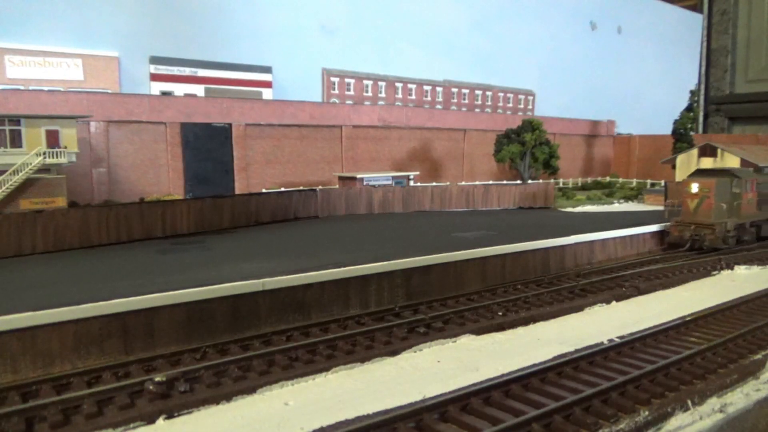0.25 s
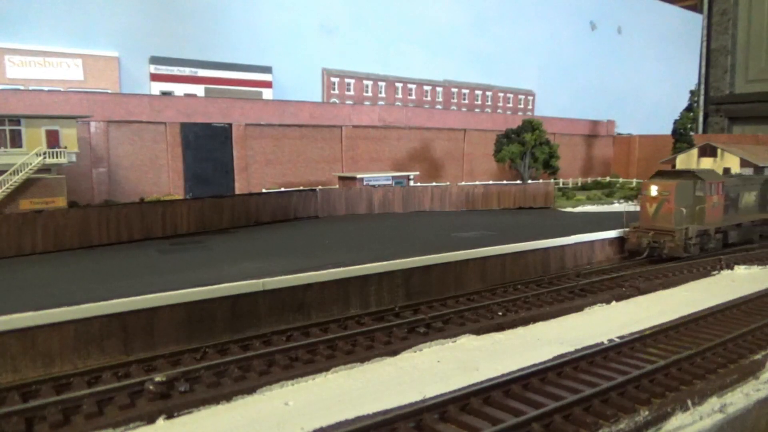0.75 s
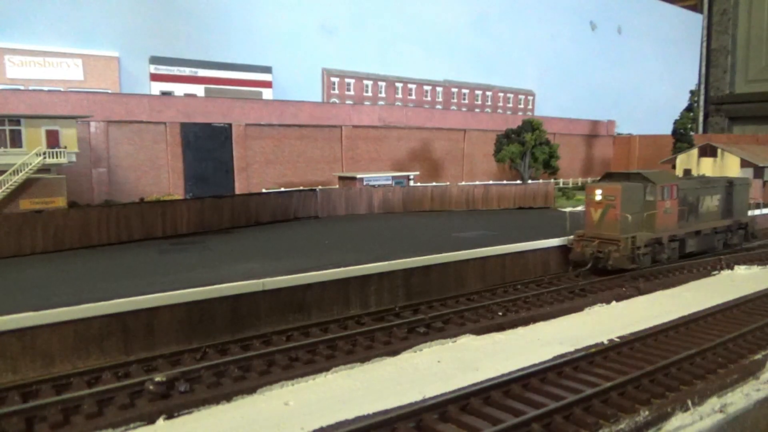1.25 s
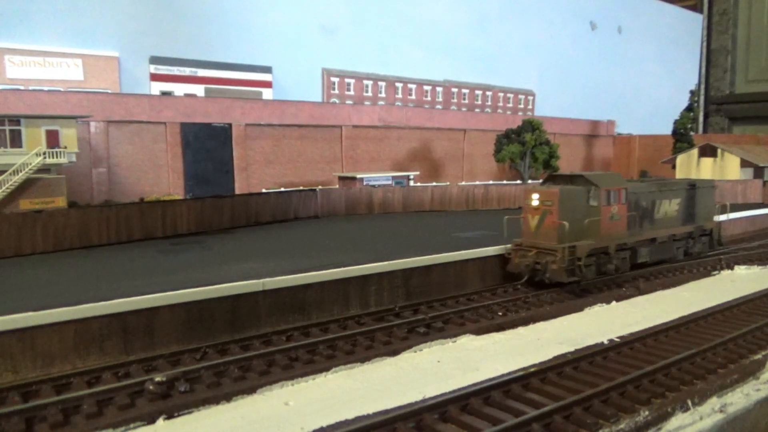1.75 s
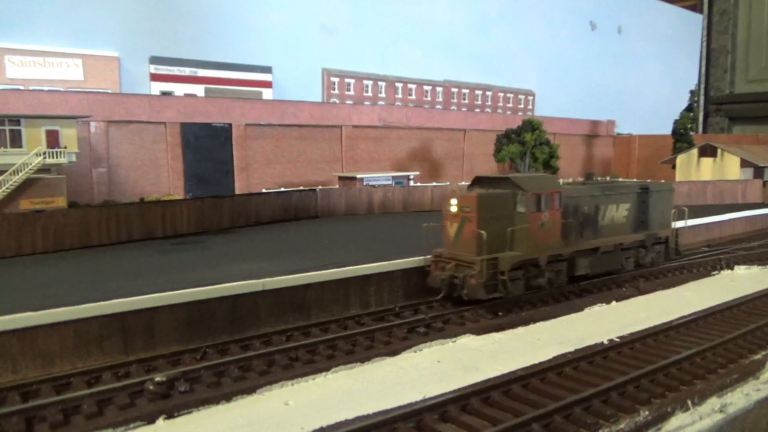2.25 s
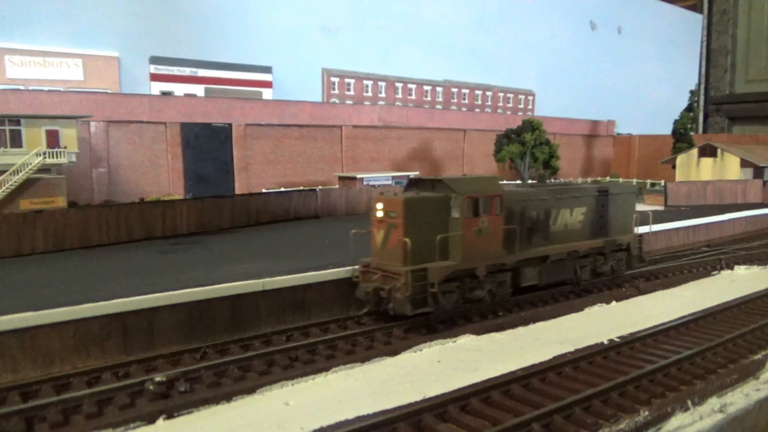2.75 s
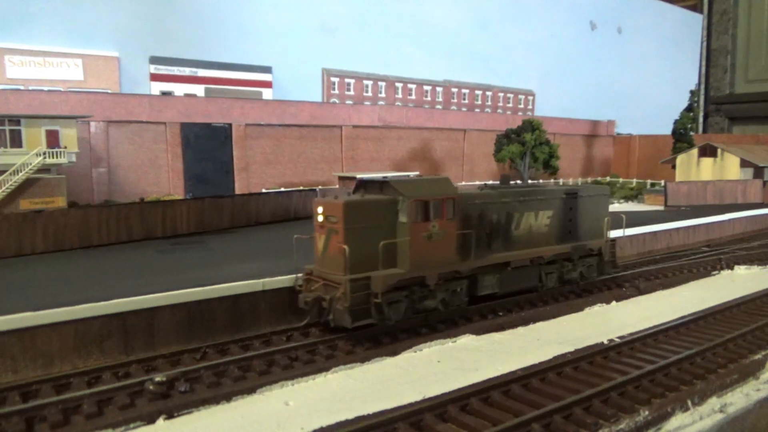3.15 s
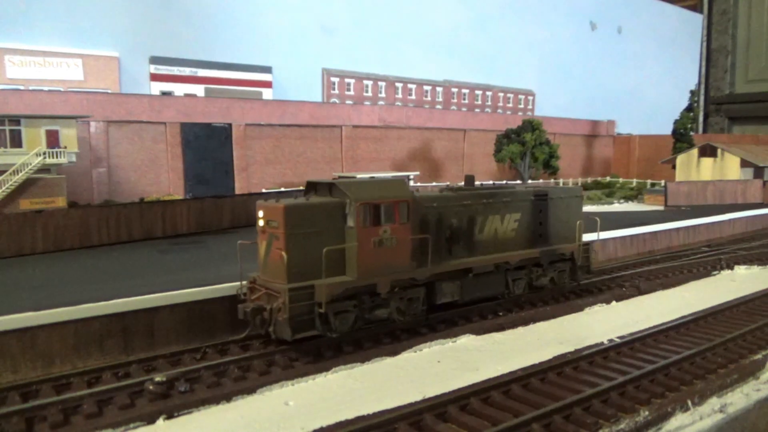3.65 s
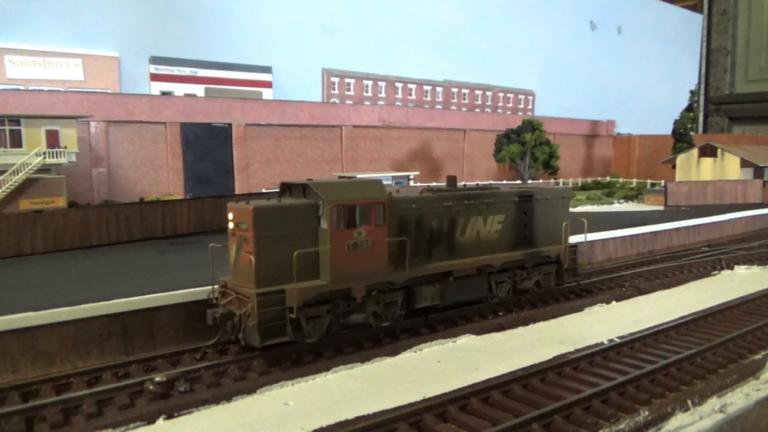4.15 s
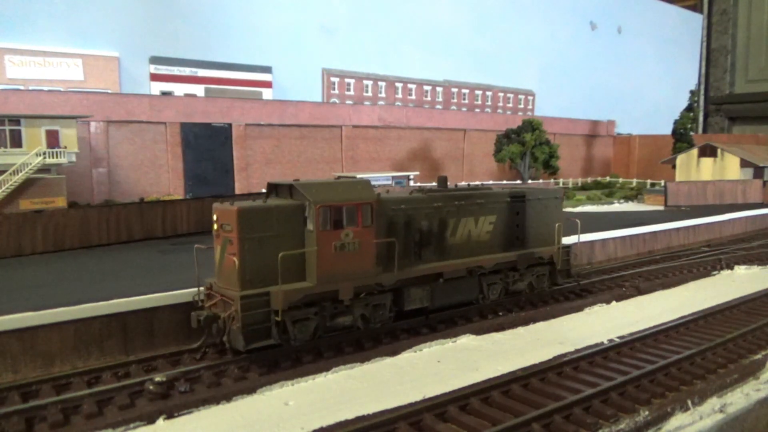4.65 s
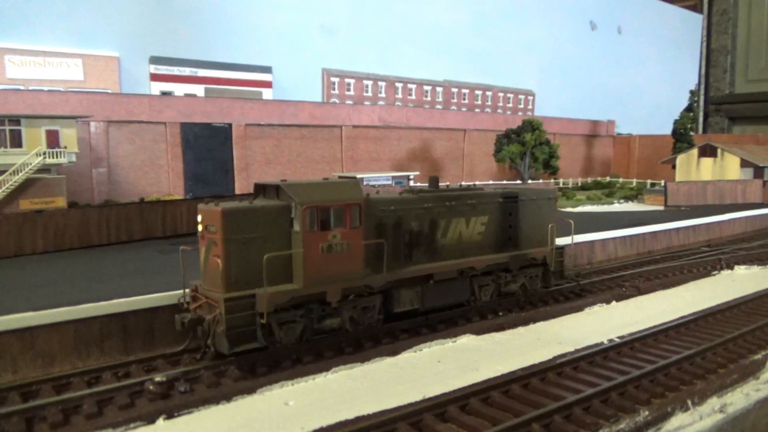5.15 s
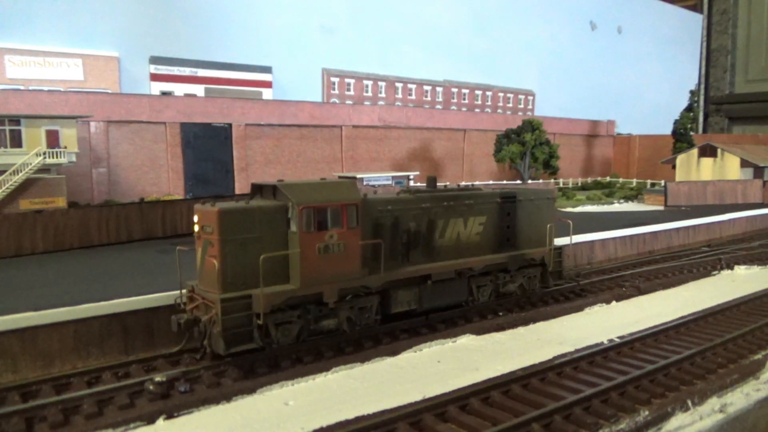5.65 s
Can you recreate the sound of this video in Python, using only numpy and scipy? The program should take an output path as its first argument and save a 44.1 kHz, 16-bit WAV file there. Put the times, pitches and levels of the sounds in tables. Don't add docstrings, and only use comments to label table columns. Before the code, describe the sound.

A quiet small room, microphone close to a model railway, with very faint transformer hum. From 0 s a small locomotive rolls steadily: soft hollow baseboard rumble, thin gear whirr, bright airy flange hiss with fine grit. Over it come dense, irregular dry metallic ticks. Stronger clacks, a bright snap with a short woody knock, fall near 0.34, 0.63, 1.8, 2.1 and 2.74 s, with brief close reflections. The hiss is brightest around 2 to 3.5 s. From about 3.3 s it slows; the rumble drops and a quiet, raspy motor buzz of roughly 95 pulses per second swells in, with tiny dropouts. Ticks become sparse and weaker. A very short high squeak comes at 4.02 s, and a faint thin singing tone at 4.4 to 4.8 s. Small ticks follow near 5.1 to 5.3 s. At 5.62 s the buzz ends with a little click, then tiny settling ticks and near silence.

```python
import sys
import numpy as np
from scipy import signal
from scipy.fft import rfft, irfft
from scipy.io import wavfile
from scipy.ndimage import uniform_filter1d, map_coordinates

SR = 44100
rng = np.random.default_rng(int(sys.argv[2]) if len(sys.argv) > 2 else 0)


def unload_wav(signal):
    wavfile.write(
        sys.argv[1],
        SR,
        np.round(np.clip(np.atleast_2d(signal).T, -1, 1) * 32767).astype(np.int16),
    )


def attenuation_scalar(level_db):
    decades = np.asarray(level_db, float) / 20
    return 10 ** decades


N = 259737
TOP_HZ = 11030

# (frequency [Hz], density [dB per Hz])
ROOM_AIR = [(12, -63), (20, -30), (191, -12), (243, -8.5), (285, -3.5), (352, -5), (402, -8), (459, -6),
            (702, -13.5), (1690, -17.5), (3450, -16), (5720, -21.5), (8980, -28), (10300, -16.5),
            (11400, -26), (14800, -65), (22000, -120)]
# (frequency [Hz], level [dB rms])
MAINS = [(100, -91), (150, -87.5), (200, -79), (300, -71.5), (400, -68), (500, -80.5), (7800, -84),
         (8780, -89.5)]
# (frequency [Hz], likeness [0..1])
ALIKE = [(30, 0.94), (300, 0.84), (1000, 0.59), (4000, 0.71), (10000, 0.68)]
# (time [s], level [dB])
SQUEAK = [
    (4.0105, -44.5),
    (4.033, -40.5),
    (4.042, -52),
]
# (frequency [Hz], width [Hz], level [dB])
SQUEAK_RINGS = [(2880, 49, -2), (5170, 250, 5.5), (6850, 240, 4), (8400, 280, 3.5), (10040, 390, 6)]
# (time [s], level [dB])
WIPER = [
    (4.41, -72),
    (4.45, -68),
    (4.785, -65),
]
# (time [s], peak level [dB], pitch [Hz], t60 [s])
RIMS = [(.3444, -21.5, 5410, 0.01), (.6266, -24.5, 4430, 0.016), (.798, -26.5, 5570, 0.014),
        (1.7937, -16.5, 7970, 0.0077), (2.0389, -22.5, 8680, 0.023), (2.0395, -24.5, 4660, .012),
        (2.086, -18, 5120, 0.01), (2.089, -27, 6700, 0.0057), (2.7414, -17, 6550, .011),
        (2.8713, -29.5, 6640, 0.017), (3.214, -22, 5640, 0.011)]
# (time [s], peak level [dB])
COUPLER = [(.2104, -34), (.3022, -32), (.4274, -42), (.7367, -37), (.7834, -41), (.903, -32), (1.015, -30),
           (1.411, -32.5), (1.9919, -33), (2.016, -31), (3.3583, -31.5), (3.398, -38)]
# (time [s], peak level [dB])
AXLES = [(.1125, -29.5), (.1595, -30.5), (.178, -31), (.313, -44), (.508, -32.5), (.532, -30.5),
         (.5466, -29), (.57, -36), (.6609, -33), (.673, -38), (.761, -33), (.8295, -28), (.8583, -27.5),
         (.9172, -29), (.9325, -28.5), (.945, -29), (1.0789, -28.5), (1.2792, -26.5), (1.296, -27.5),
         (1.6691, -31.5), (1.7357, -31), (2.9616, -32), (3.1843, -32), (3.747, -39), (3.7899, -34.5),
         (3.9776, -42)]
# (time [s], peak level [dB])
PICKUPS = [(.1461, -42), (.521, -34), (1.2083, -36.5), (1.3467, -30), (1.4356, -41), (1.5058, -27.5),
           (1.551, -28), (1.5974, -29), (1.6202, -30), (1.6432, -31), (1.8766, -29.5), (1.9004, -34),
           (2.0677, -24), (2.3765, -28.5), (2.4379, -37), (2.453, -30), (2.6492, -24.5), (2.7753, -28.5),
           (2.8415, -34), (2.8913, -27.5), (3.03, -29), (3.081, -33), (3.129, -43), (3.155, -31),
           (3.2735, -28)]
# (time [s], peak level [dB])
CREEPING = [(3.5735, -34), (3.6036, -30), (3.6262, -33), (3.6987, -29), (3.716, -28), (4.156, -36),
            (4.2068, -35.5), (4.2279, -38), (4.2749, -36.5), (4.2994, -39), (4.8753, -41), (5.1238, -41),
            (5.1412, -42.5), (5.1754, -33.5), (5.2704, -39.5)]
# (contacts, pitch [Hz], t60 [s])
LOOSE_PARTS = [(COUPLER, 3600, 0.005), (AXLES, 5200, 0.0068), (PICKUPS, 8400, 0.0039),
               (CREEPING, 9100, 0.014)]
# (time [s], peak level [dB], board pitch [Hz], chassis level re peak [dB], chassis pitch [Hz])
JOINTS = [(0.3437, -24.5, 1043, 0.5, 2530), (0.6263, -20.5, 1179, -9, 2400),
          (0.7994, -39.5, 1190, -1, 2430), (.9333, -40, 1070, 0, 2560), (1.0794, -50.5, 1175, 9, 1890),
          (1.2951, -43.5, 1110, -1.5, 3060), (1.7928, -26, 1210, -5.5, 2915),
          (2.084, -18.5, 1059, -7, 2050), (2.1966, -40.5, 1090, -0.5, 3340), (2.6277, -49.5, 1190, 7, 2380),
          (2.6858, -40.5, 1145, -27, 2190), (2.7417, -30, 1228, 0.5, 2210), (2.8705, -35, 1120, -2, 2550),
          (3.0837, -45, 1150, -5, 2300), (3.1597, -48, 1640, 2.5, 2410), (3.2118, -39, 1310, 7.5, 2160),
          (3.3981, -45, 1300, -3, 2300), (3.556, -61, 1200, 12.5, 3380), (4.0856, -56.5, 1110, 4.5, 2320),
          (4.374, -54, 810, -7, 2500), (4.67, -52, 1070, -11, 2250), (4.81, -50, 970, -2, 2320),
          (4.9197, -62, 1230, 13.5, 2640), (4.937, -49, 996, -12, 2330)]
# (time [s], speed re cruising [dB], give of the board [dB], flange pressure [dB])
RUN = [(0, -1, 3, -10), (.31, 1.5, 1, -6.5), (.7, 0.5, 4, -7), (.95, 0.5, -5, -3), (1.3, 0, -8.5, -2),
       (1.6, 0.5, -3, -2.5), (1.9, 1, -1.5, -3.5), (2.1, 2, 2, -1), (2.48, 0, -4.5, 0), (2.82, 0, -0.5, 0),
       (3.2, -3.5, -1.5, 2), (3.48, -2.5, -7, 0), (4.05, -6.5, -7, 1), (4.75, -6.5, -3.5, -0.5),
       (5.4, -9.5, -4.5, -3.5), (5.65, -13, 7, -2), (5.89, -16.5, 13, 0.5)]
# (frequency [Hz], density [dB per Hz])
FLANGE_HISS = [(2240, -12.5), (3800, -10), (4300, -10), (4670, -3.5), (5080, -0.5), (6300, 1), (7540, -0.5),
               (8690, 2.5), (9490, 0), (11000, -4.5), (11400, -9), (14800, -49), (22000, -120)]
# (frequency [Hz], width [Hz], level [dB])
MOTOR_CASE = [(2310, 120, 1), (2640, 180, -4), (3010, 120, -4), (3370, 240, -2.5), (3950, 160, -11)]
# (time [s], current pulses [per s])
PULSES = [(3.3, 92), (3.55, 94), (4.01, 96.2), (4.07, 93.8), (4.4, 96.6), (4.59, 90.7), (4.8, 91.8),
          (5.04, 97.6), (5.62, 98.1)]
BUZZ_FROM_S, SWELL_S, BUZZ_TO_S, SURGE_S = 3.3, .25, 5.62, .025
BUZZ_START_DB, BUZZ_DB, SURGE_DB = -72, -64.6, -61
# (time [s], level [dB])
LOAD = [
    (BUZZ_FROM_S, BUZZ_START_DB),
    (BUZZ_FROM_S + SWELL_S, BUZZ_DB),
    (BUZZ_TO_S - SURGE_S, BUZZ_DB),
    (BUZZ_TO_S, SURGE_DB),
]
# (time [s], length [s], depth [dB])
STALLS = [(3.847, 0.015, -17), (4.063, 0.037, -17), (4.28, 0.017, -14), (4.412, 0.024, -21),
          (4.835, 0.061, -8), (5.179, 0.037, -21), (5.453, 0.081, -8)]
# (time [s], peak level [dB], pitch [Hz])
SETTLE = [(5.623, -44, 2660), (5.6516, -52, 2760), (5.6755, -58, 3560), (5.7114, -64, 3500),
          (5.7523, -55, 3410), (5.7907, -64, 2710), (5.8343, -58, 3480), (5.8711, -61, 3470)]
# (frequency [Hz], density [dB per Hz])
BOARD = [(210, -44), (350, -14.5), (395, -10), (427, -13), (520, -10), (695, -6), (824, -8), (1140, -9.5),
         (1370, -9), (1900, -13.5), (2470, -44), (4180, -120)]
# (frequency [Hz], density [dB per Hz])
LEGS = [(15, -60), (25, -31), (172, -9), (195, -14), (226, -6), (280, -8), (360, -45), (620, -120)]
# (frequency [Hz], density [dB per Hz])
GEARS = [(880, -49), (1500, -6), (1680, -0.5), (1820, -7), (2220, 2), (2840, -1), (3290, -1), (3540, -3),
         (4500, -6.5), (5850, -11), (9900, -120)]


def unit(x):
    return x / np.sqrt(np.mean(x ** 2) + 1e-20)


def along(points, hz):
    f, v = np.transpose(points)
    return np.interp(np.log(hz + 1), np.log(f + 1), v)


def curves(rows):
    s, *cols = np.transpose(rows)
    return [np.interp(np.arange(N) / SR, s, c) for c in cols]


def during(rows):
    start, end = rows[0][0], rows[-1][0]
    return np.interp(np.arange(N) / SR, [start - .002, start, end, end + .002], [0, 1, 1, 0])


def wobble(rate):
    coarse = np.arange(0, N + 16, 16)
    knots = rng.standard_normal(int(N * rate / SR) + 4)
    return np.interp(np.arange(N), coarse, map_coordinates(knots, [coarse * rate / SR]))


def filtered(x, response):
    m = 9 * 2 ** 15
    return irfft(rfft(x, m) * response(np.fft.rfftfreq(m, 1 / SR)), m)[..., :N]


def rings(modes):
    def response(f):
        total = 0
        for k, (centre, width, db) in enumerate(modes):
            damping = 1j * f * width
            total = total + (-1) ** k * attenuation_scalar(db) * damping / (centre * centre - f * f + damping)
        return total
    return response


def rush(spectrum, lumps_db, rate):
    pair = rng.standard_normal((2, N)) * attenuation_scalar(lumps_db * wobble(rate))

    def response(hz):
        turn = np.arccos(np.clip(along(ALIKE, hz), -1, 1)) / 2
        return attenuation_scalar(along(spectrum, hz)) * [np.cos(turn), np.sin(turn)]
    mid, side = filtered(pair, response)
    return unit(np.array([mid + side, mid - side]))


def band(centre_hz, width_hz, lumps_db, rate, apart_hz=0):
    noise = rng.standard_normal((4, N)) * attenuation_scalar(lumps_db * wobble(rate))
    slow = filtered(noise, lambda hz: 1 / (1 + (2 * hz / width_hz) ** 4))
    turn = 2 * np.pi * np.cumsum(centre_hz) / SR
    second_turn = turn + 2 * np.pi * apart_hz * np.arange(N) / SR
    mid, side = slow[:2] * np.cos(turn) + slow[2:] * np.sin(second_turn)
    return unit(np.array([mid + 0.054 * side, mid - 0.32 * side]))


def struck(hz, spread, t60, attack, count, noisy):
    t = np.arange(int(SR * t60 * 1.5)) / SR
    draw = rng.standard_normal((count, 3))
    pitch = np.minimum(hz * np.exp(spread * draw[:, :1]), TOP_HZ)
    mode_t60 = t60 * np.exp(0.3 * draw[:, 2:])
    modes = attenuation_scalar(1.43 * draw[:, 1:2] - 60 * t / mode_t60) * np.sin(2 * np.pi * pitch * t)
    ring = np.sin(2 * np.pi * hz * t) * attenuation_scalar(9.0 - 60 * t / t60) + modes.sum(0)
    chatter = uniform_filter1d(rng.standard_normal(SR // 10), max(2, int(SR / hz)))[:len(t)]
    ring = ring * (1 + noisy * unit(chatter)) * (1 - np.exp(-t / attack))
    return ring / np.abs(ring).max()


def add(track, s, sound):
    track[round(s * SR):][:len(sound)] += sound


def room():
    t = np.arange(N) / SR
    hum = np.zeros(N)
    for hz, db in MAINS:
        level = attenuation_scalar(db + 1.5 + 0.15 * wobble(13))
        hum += level * np.sin(2 * np.pi * hz * t + rng.uniform(0, 6.16))
    return hum + attenuation_scalar(-69) * rush(ROOM_AIR, lumps_db=1.2, rate=97)


def walls(x, t60):
    t = np.arange(SR // 3) / SR
    tail = rng.standard_normal((2, len(t))) * attenuation_scalar(-60 * t / t60) * (t > .0015)
    return signal.fftconvolve(x[None], tail / np.linalg.norm(tail[0]), axes=1)[:, :N]


def squeaks():
    slips = rng.standard_normal(N) * attenuation_scalar(2.2 * wobble(300))
    squeak = unit(filtered(slips, rings(SQUEAK_RINGS)))
    wiper_ring = rings([(9830, 330, 0)])
    sing = unit(filtered(rng.standard_normal(N), lambda f: wiper_ring(f) ** 2))
    squeak = attenuation_scalar(curves(SQUEAK)[0]) * during(SQUEAK) * squeak
    return squeak + attenuation_scalar(curves(WIPER)[0] - 4.0) * during(WIPER) * sing


def ticks():
    track, t = np.zeros(N + SR), np.arange(SR // 30) / SR
    contacts = list(RIMS)
    for hits, hz, t60 in LOOSE_PARTS:
        contacts += [(s, db, hz, t60) for s, db in hits]
    for s, db, hz, t60 in contacts:
        crack = np.diff(rng.standard_normal(len(t) + 1))
        crack = crack * attenuation_scalar(-8 - 60 * t / (0.67 * t60)) * (1 - np.exp(-t / 0.0003))
        ring = struck(hz, spread=0.184, t60=np.clip(t60, .004, .04), attack=0.00012, count=9, noisy=1.0)
        add(track, s, attenuation_scalar(db - 1.5) * crack)
        add(track, s, attenuation_scalar(db - 3.0) * ring)
    return signal.sosfilt(signal.butter(2, 2600, "high", fs=SR, output="sos"), track[:N])


def joints():
    track, shakes, t = np.zeros(N + SR), np.zeros(N + SR), np.arange(SR // 8) / SR
    table_db = -8.5
    for s, db, board_hz, chassis_db, chassis_hz in JOINTS:
        chassis = struck(chassis_hz, spread=0.216, t60=0.019, attack=0.0011, count=14, noisy=0.11)
        board = struck(board_hz, spread=0.1305, t60=0.041, attack=0.0022, count=9, noisy=0.1)
        table = struck(674.0, spread=0.122, t60=0.064, attack=0.00011, count=3, noisy=0.2)
        shake = attenuation_scalar(db + 0.94 * chassis_db - 10.5 - 60 * t / 0.12) * (1 - np.exp(-t / 0.0014))
        add(track, s + 0.000795, attenuation_scalar(db + 1.5 + chassis_db) * chassis)
        add(track, s + 0.00103, attenuation_scalar(db - 2.5) * board)
        add(track, s + 0.001, attenuation_scalar(db + chassis_db + table_db) * table)
        add(shakes, s + 0.00121, shake * rng.standard_normal(len(t)))
    shell = signal.butter(2, [700, 2700], "band", fs=SR, output="sos")
    return track[:N] + signal.sosfilt(shell, shakes[:N])


def flanges():
    speed_db, _, press_db = curves(RUN)
    hiss_db = -62.5 + speed_db + 0.47 * press_db
    bright_db = -61 + speed_db + 4.2 * press_db
    hiss = attenuation_scalar(hiss_db + 2.0 + 1.2 * wobble(22)) * rush(FLANGE_HISS, lumps_db=0.5, rate=170)
    bright_hz = 8270 - 180 * np.arange(N) / SR + 120 * wobble(4.4)
    bright = band(bright_hz, width_hz=1260, lumps_db=4.0, rate=210, apart_hz=1530)
    grains = (rng.random(N) < 170 / SR) * rng.standard_normal(N)
    scrape = np.hanning(260) * attenuation_scalar(-60 * np.arange(260) / SR / .008)
    grit = signal.fftconvolve(grains, scrape)[:N] * rng.standard_normal(N)
    grit = unit(filtered(grit, lambda hz: attenuation_scalar(along(FLANGE_HISS, hz))))
    return hiss + attenuation_scalar(bright_db - 1.0) * bright + attenuation_scalar(hiss_db + 0.3) * grit


def motor():
    t = np.arange(N) / SR
    hunting = 1.2 * wobble(25) * (np.arange(N) < 4.4 * SR)
    pulse_count = np.floor(np.cumsum(curves(PULSES)[0] + hunting) / SR)
    kicks = np.diff(pulse_count, prepend=0) * attenuation_scalar(1.0 * rng.standard_normal(N) + 1.2 * wobble(14))
    rattle_decay = attenuation_scalar(-60 * np.arange(400) / SR / .012)
    rattle = signal.fftconvolve(kicks, rattle_decay)[:N] * rng.standard_normal(N)
    case = rings(MOTOR_CASE)
    skirts = lambda hz: 1 / (1 + (2050 / (hz + 1)) ** 12) / (1 + (hz / 4300) ** 6)
    buzz = filtered(unit(kicks) + .18 * unit(rattle), lambda hz: case(hz) * skirts(hz))
    stall_db = sum(db * np.clip(2 - 3 * abs(t - s) / length, 0, 1) for s, length, db in STALLS)
    buzz = unit(buzz * attenuation_scalar(stall_db))
    settling = np.zeros(N + SR)
    for s, db, hz in SETTLE:
        ring = struck(hz, spread=0.0876, t60=0.025, attack=0.00059, count=2, noisy=0.31)
        add(settling, s, attenuation_scalar(db - 3.5) * ring)
    return attenuation_scalar(curves(LOAD)[0]) * buzz * during(LOAD) + settling[:N]


def rolling():
    speed_db, give_db, _ = curves(RUN)
    on_frame = np.clip((np.arange(N) / SR - 3.36) / 0.12, 0, 1)
    rumble_re_cruise_db = speed_db + 0.27 * give_db - 3.5 * on_frame
    ring_db = -57.5 + 2.16 * speed_db + give_db
    bumps = wobble(24.18)
    rumble = attenuation_scalar(-59.5 + rumble_re_cruise_db + 4.0 + 1.4 * bumps) * rush(BOARD, lumps_db=-0.1, rate=43)
    ring_hz = 1110 * np.exp(.06 * wobble(5))
    ring = attenuation_scalar(ring_db + .6 * bumps) * band(ring_hz, width_hz=260, lumps_db=-1.0, rate=79)
    legs = attenuation_scalar(0.57 * rumble_re_cruise_db - 77) * rush(LEGS, lumps_db=4.5, rate=9.1)
    grind = attenuation_scalar(1.2 * bumps) * rush(GEARS, lumps_db=1.8, rate=110)
    gears = attenuation_scalar(-57 + speed_db - 2.9 * during(LOAD)) * grind
    return rumble + ring + legs + gears


def scene():
    knocks = signal.sosfilt(signal.butter(2, 420, "high", fs=SR, output="sos"), joints())
    near = knocks + ticks() + squeaks()
    buzz = motor()
    echoes = attenuation_scalar(-10) * walls(near + .4 * buzz, t60=0.079) + attenuation_scalar(-19.5) * walls(knocks, t60=0.45)
    return near + buzz + echoes + rolling() + flanges() + room()


def roll_off(x):
    return signal.sosfilt(signal.butter(12, 11970, fs=SR, output="sos"), x)


def record(dry):
    mic = lambda hz: attenuation_scalar(-38) + 1 / (1 + np.exp(np.clip((hz - TOP_HZ) / 45, -50, 50)))
    return roll_off(filtered(dry, mic))


dry = scene()
out = record(dry)
unload_wav(out)
```